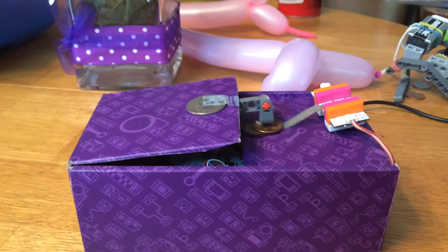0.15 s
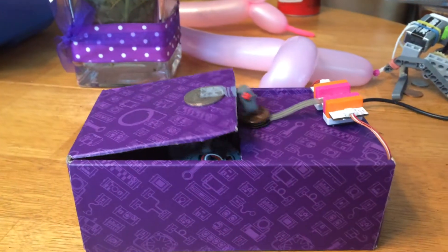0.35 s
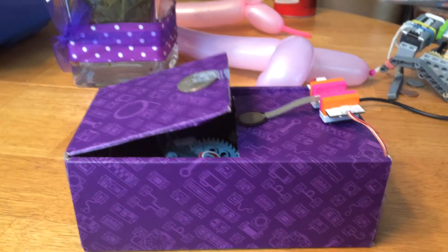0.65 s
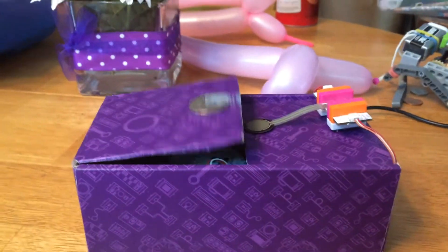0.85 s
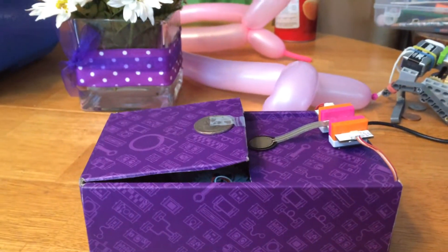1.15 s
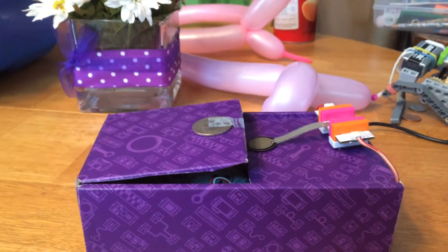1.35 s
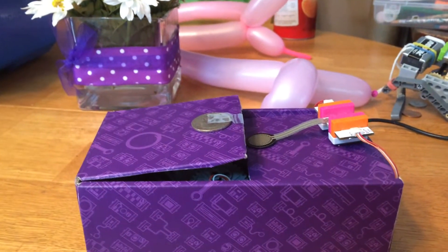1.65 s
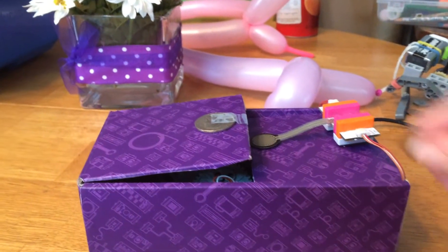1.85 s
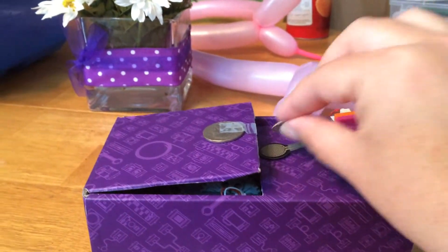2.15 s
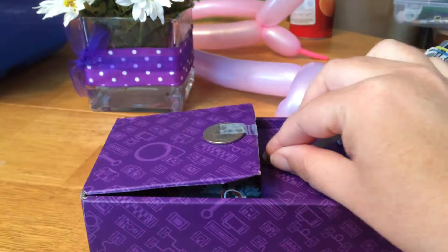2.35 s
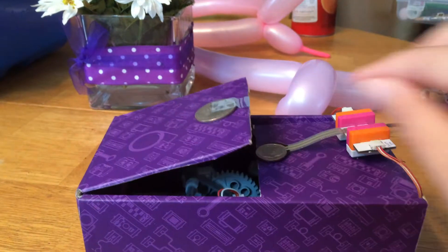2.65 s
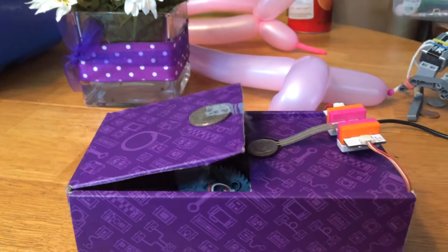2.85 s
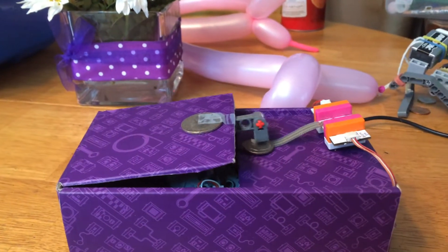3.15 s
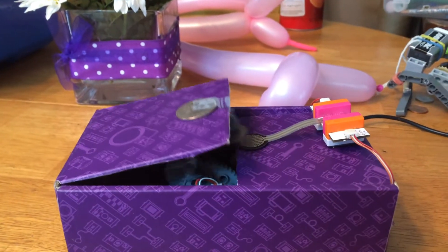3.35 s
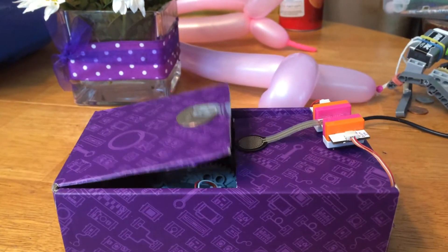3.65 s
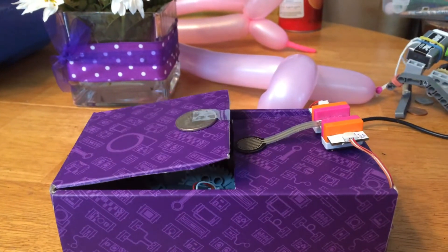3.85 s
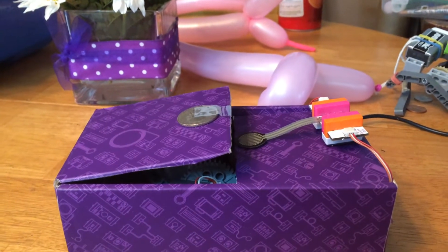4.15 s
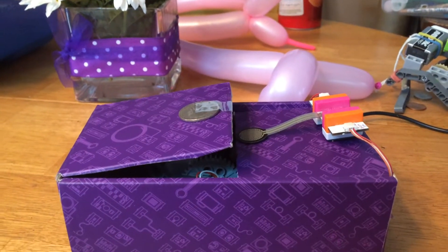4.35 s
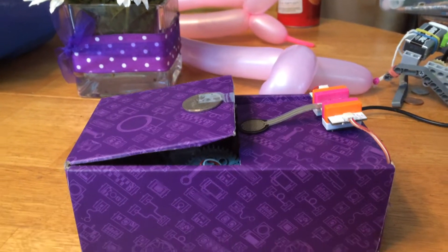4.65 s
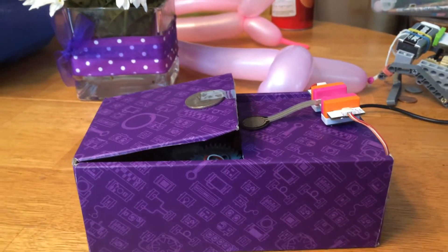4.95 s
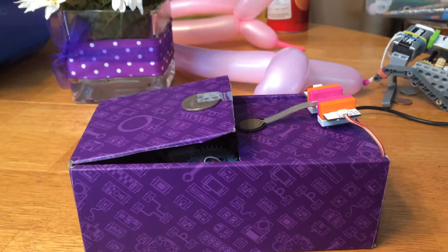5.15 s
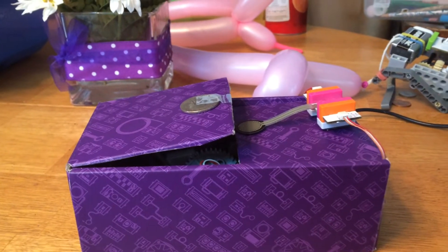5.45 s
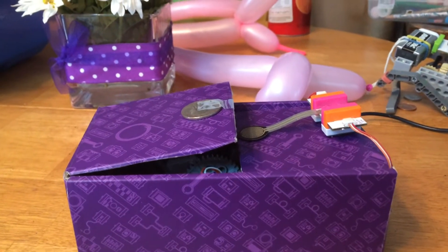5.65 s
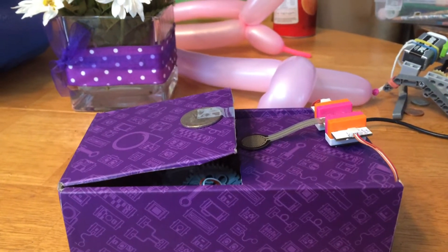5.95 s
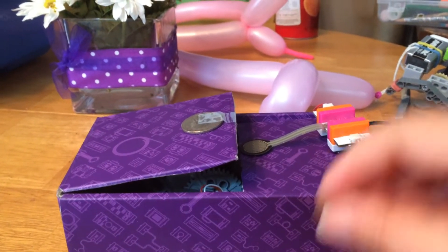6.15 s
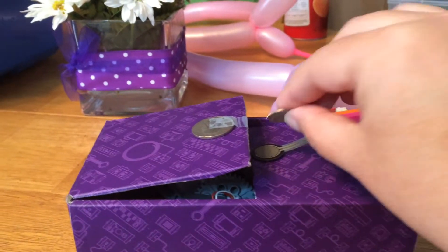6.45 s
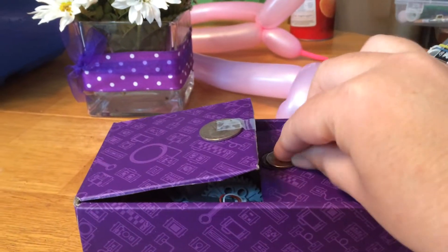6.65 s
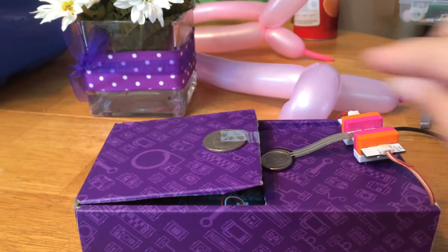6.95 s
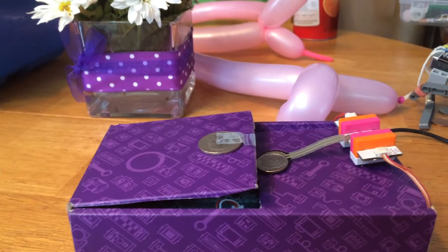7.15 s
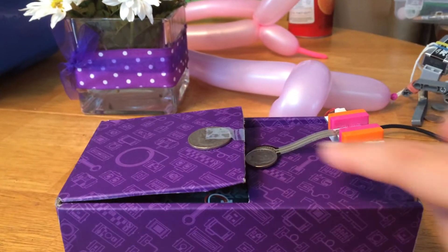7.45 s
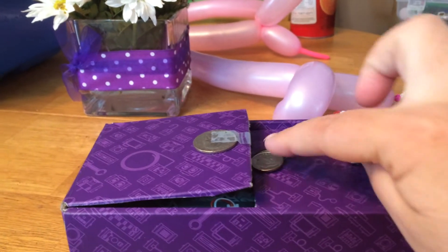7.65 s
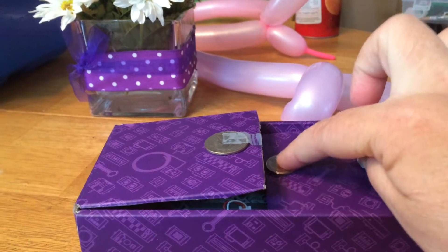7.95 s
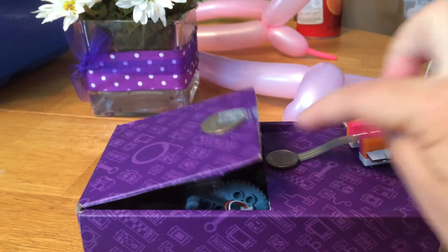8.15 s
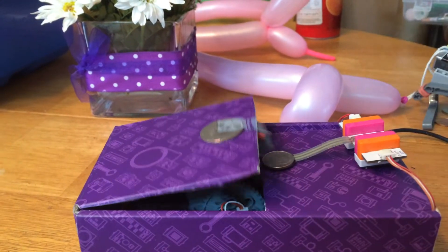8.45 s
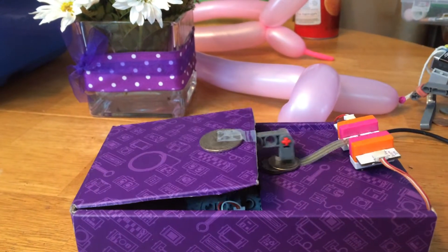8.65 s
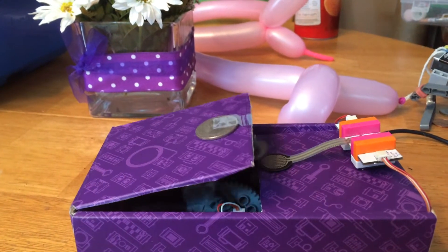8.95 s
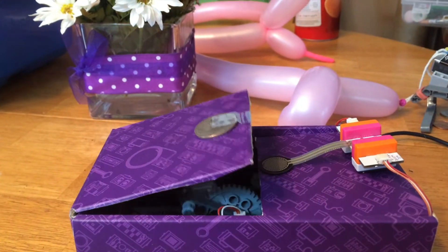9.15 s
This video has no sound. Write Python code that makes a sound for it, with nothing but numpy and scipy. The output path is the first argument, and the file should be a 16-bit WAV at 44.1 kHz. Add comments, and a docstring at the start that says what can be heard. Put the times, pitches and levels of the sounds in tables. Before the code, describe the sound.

Close, dry sound of a motorised toy coin bank on a table. Short spells of raspy plastic gear noise alternate with quiet pauses of faint air and hum. Hollow cardboard thuds and plastic clacks mark the lid and swinging arm. After each of the first two spells a coin ticks down through the works and jingles to rest on other coins. The last spell runs to the end with no coin falling.

```python
"""A small motor whirrs, plastic knocks, and twice a coin tumbles, drops and rings on other coins.
It is a toy coin bank, a cardboard box on a table in a quiet room: a coin laid on its pad is taken by
a motor that lifts the lid and swings an arm. The gears are noise scraped in step with their teeth.
Box, plastic and coins ring with dying tones plus coloured noise for the surfaces that touch.
Scuffs and a fingertip are short shaped noises; still air, a mains hum and a room tail lie around it."""
import sys
import numpy as np
from scipy import signal
from scipy.fft import rfft, irfft
from scipy.io import wavfile

SR = 44100
rng = np.random.default_rng(int(sys.argv[2]) if len(sys.argv) > 2 else 0)


def output_pcm(signal):
    """Save a mono or channel-first signal as 16-bit PCM at the path in sys.argv[1].

    Samples are clipped to [-1, 1] before scaling.
    """
    pcm = np.clip(np.atleast_2d(signal).T, -1, 1) * 32767
    wavfile.write(sys.argv[1], SR, np.round(pcm).astype(np.int16))


N = 409688
TIME = np.arange(N) / SR  # s, the whole scene
HIT = np.arange(16384) / SR  # s, the length of one hit

# In all tables levels are relative: the functions that use them may add a trim.
# Spells of the motor: switched on t/s, switched off t/s, gear level/dB
MOTOR_SPELLS = [(-.1, 0.964, -0.5), (2.47, 3.815, 0), (6.828, 6.915, 1.5), (8.126, 9.4, -0.1)]
# Once a spell the swinging arm strikes the box: t/s, strength/dB
ARM_STRIKES = [(.068, -44), (2.986, -21), (6.932, -22.5), (8.577, -20)]
# Tone colour of shaken or rubbed cardboard: f/Hz, level per Hz/dB
CARD_COLOUR = [(25, -23), (150, -6), (330, -0.5), (580, -2.5), (950, -2), (1400, -11.5), (2200, -11),
               (5000, -38.5)]
# Tones that the cardboard rings with: f/Hz, level/dB, time to fall 60 dB/s
BOX_TONES = [(313.4, -18, 0.2), (496, -8.5, 0.077), (567, 3, 0.031), (644, -5, 0.039), (720, -3, 0.046),
             (850, -1, .05), (960, -4, 0.042), (1165, -0.5, 0.016)]
# Tone colour of clacking plastic: f/Hz, level per Hz/dB
CLACK_COLOUR = [(60, -47.5), (500, -20.5), (1100, -4), (1550, -2), (1950, -2), (2700, -3.5), (3700, -8),
                (4600, -20.5), (8000, -31)]
# Tone colour of the tick of a hard edge: f/Hz, level per Hz/dB
TICK_COLOUR = [(300, -44.5), (2500, -20.5), (4500, -9), (5600, -2.5), (6600, 1), (8200, -3.5),
               (10500, -8.5), (13000, -7), (15200, -14.5), (16500, -34.5)]
# A coin tumbles down through the works: t/s, strength/dB, hardness/dB
COIN_TUMBLES = [(1.341, -34.5, -2.5), (1.358, -24.5, -5), (1.377, -30.5, -3.5), (1.424, -40.5, -0.5),
                (1.468, -30, -0.5), (1.48, -27.5, -8), (1.527, -25.5, 8.5), (4.926, -27, -1.5),
                (4.932, -22, -16.5), (4.959, -28.5, -3), (4.982, -35, 10.5)]
# One table a falling coin, a row a bounce on the pile: t/s, clink level/dB, blow on the box/dB
COIN_DROPS = [
    [(1.5279, -17.5, -22.5), (1.5654, -20.5, -29), (1.5863, -17, -22), (1.5938, -13, -36),
     (1.6354, -25.5, -27), (1.6696, -27.5, -34.5), (1.7449, -24.5, -40.5)],
    [(4.9916, -16.5, -20), (5.0355, -19, -34), (5.0779, -14.5, -25), (5.1397, -13, -27.5),
     (5.1931, -15.5, -26), (5.2234, -21.5, -33), (5.3009, -20, -34.5)],
]
# One table a coin, a row a tone it rings with: f/Hz, level/dB, time to fall 60 dB/s
COIN_TONES = [
    [(8460, -11, 0.072), (9205, 0, 0.068), (9500, -1, 0.032), (9600, -8.5, .05), (13110, -11.5, .2),
     (15070, 0.5, 0.26), (15490, -13.5, .07)],
    [(9400, 0, .07), (9010, 1.5, 0.14), (9360, 6.5, .075), (10040, 1.5, .06), (12160, -7.5, 0.15),
     (15200, 10.5, .06), (15440, -3.5, 0.079)],
]
# A coin is set down on the pad: t/s, strength/dB, f that this spot of the card favours/Hz
COIN_TAPS = [(2.312, -35, 1200), (2.333, -41.5, 1200), (2.399, -27.5, 450), (6.663, -33, 560),
             (6.712, -29, 580), (6.72, -24.5, 580), (6.773, -37.5, 580)]


def amp(db):
    """Turns decibels into a gain."""
    return 10 ** (np.asarray(db) / 20)


def evened(x):
    """Scales a sound to an average (rms) level of 1."""
    return x / np.sqrt(np.mean(x ** 2) + 1e-20)


def blow(x):
    """Scales a hit to the energy of 5 ms at rms 1."""
    return x / np.sqrt(np.sum(x ** 2) / (.005 * SR) + 1e-20)


def read(points, hz):
    """Joins (Hz, value) points by straight lines on a log-frequency axis."""
    f, value = np.transpose(points)
    return np.interp(np.log(hz + 1), np.log(f + 1), value)


def add(mix, s, sound):
    """Mixes a sound in at time s."""
    part = mix[max(round(s * SR), 0):][:len(sound)]
    part += sound[:len(part)]


def colour(x, points, size=4096):
    """Filters a sound to the given tone colour, with no echo ahead of a hit."""
    log_gain = np.log(amp(read(points, abs(np.fft.fftfreq(size, 1 / SR)))))
    # the Hilbert transform supplies the phase that keeps the filter causal
    response = np.fft.ifft(np.exp(np.conj(signal.hilbert(log_gain)))).real[:size // 2]
    return signal.oaconvolve(x, response)[:len(x)]


def resonate(x, hz, width):
    """One resonance that leaves its centre at gain 1; hz and width in Hz."""
    return signal.lfilter(*signal.iirpeak(hz, hz / width, SR), x)


def drift(rate):
    """Slow random drift of rms 1 with about rate swings a second."""
    hz = np.fft.rfftfreq(N // 32, 32 / SR)
    slow = irfft(rfft(rng.standard_normal(N // 32)) / (1 + (hz / rate) ** 4))
    return evened(np.interp(TIME, np.linspace(0, TIME[-1], len(slow)), slow))


def ring(tones, spread_db, detune):
    """Dying tones of a struck body; each blow lands on another spot and weights them anew."""
    hz, db, t60 = np.transpose(tones)[:, :, None]
    weight, shift, side = rng.standard_normal((3, len(tones), 1))
    level = amp(db + spread_db * weight - 60 * HIT / t60)
    waves = np.sin(2 * np.pi * hz * (1 + detune * shift) * HIT)
    return (np.sign(side) * level * waves).sum(0)


def contact(t60, first, chatter_db, chatter_t60):
    """A sharp push, a short crush of the surfaces, and fading chatter of loose parts."""
    crush, chatter = rng.standard_normal((2, len(HIT)))
    force = blow(crush * amp(-60 * HIT / t60))
    # cubing the noise makes its peaks stand out like separate small hits
    force = force + amp(chatter_db) * blow(chatter ** 3 * amp(-60 * HIT / chatter_t60))
    push = blow(1. * (HIT == 0))
    return blow(force + first * push)


def background(air_db=-69):
    """Still room air as coloured noise, and a faint mains hum of steady tones."""
    # Tone colour of the air: f/Hz, level per Hz/dB
    air_colour = [(15, -36.5), (36, -0.5), (198, -5), (239, -8), (409, -12), (1230, -22), (1890, -18),
                  (3910, -25), (12800, -26), (15400, -34)]
    # Hum tones: f/Hz, level/dB
    hum_tones = [(120, -79.5), (179, -81), (239.5, -76.5)]
    air_gain = amp(read(air_colour, np.fft.rfftfreq(N, 1 / SR)))
    air = irfft(rfft(rng.standard_normal(N)) * air_gain, N)
    hum = sum(amp(db) * np.sqrt(2) * np.sin(2 * np.pi * (hz * TIME + rng.random())) for hz, db in hum_tones)
    return amp(air_db) * evened(air) + hum


def drive(lurch_db=2.86, spin_up=449, coast=190, shudder_db=-53.5, calm=4):
    """Gains of hiss, grind and shudder: a spell spins up, follows the stroke with lurches and coasts.

    spin_up, coast and calm are in dB per s; shudder_db is the shaking as the arm strikes."""
    # Every spell follows this crank stroke: t after the arm strikes/s,
    # hiss of the fast gears/dB, grind of the loaded gears/dB
    stroke = [(-.52, -55, -54.5), (-.44, -46.5, -51.5), (-.38, -55, -50.5), (-.08, -52, -51.5),
              (.05, -59, -55.5), (.15, -56, -58), (.212, -68.5, -65), (.243, -52, -60.5), (.35, -60, -57),
              (.46, -54, -52.5), (.62, -58, -55), (.77, -56, -52.5), (.825, -67.5, -65), (.89, -61, -57.5)]
    when, hiss_db, grind_db = np.transpose(stroke)
    gains = np.zeros((3, N))
    for (on, off, db), (strike, _) in zip(MOTOR_SPELLS, ARM_STRIKES):
        power_db = db - spin_up * np.maximum(on - TIME, 0) - coast * np.maximum(TIME - off, 0)
        t = np.clip(TIME - strike, when[0], when[-1])
        stroke_db = [np.interp(t, when, hiss_db), np.interp(t, when, grind_db), shudder_db - calm * t]
        gains += amp(power_db + np.array(stroke_db))
    return gains * amp(lurch_db * np.outer([1, .5, .5], drift(22)))


def teeth(turns, force, steady, decay, spread_db):
    """Steady friction plus one scrape of uneven force for each gear beat."""
    grit = amp(3 * drift(350))
    scrape = np.exp(-(turns % 1) / decay) * amp(spread_db * force)
    return (steady + scrape) * grit * rng.standard_normal(N)


def gears(scrape, spectrum, tones, patchy_db):
    """The scraping rings the wheels; each swells and fades as it turns."""
    body = colour(scrape, spectrum)
    wheels = 0
    for hz, width, db in tones:
        swell_db = patchy_db * np.minimum(drift(18), 1.5)
        wheels = wheels + amp(db + swell_db) * resonate(body, hz, width)
    return evened(body + wheels)


def motor(tooth_hz=49.34, waver=.008):
    """Two gear stages scrape in step with the beat of the teeth and shake the box."""
    # Tone colours of the fast and the loaded gears: f/Hz, level per Hz/dB
    hiss_colour = [(5000, -18.5), (6300, -6.5), (7400, -8), (8600, -3.5), (9800, -13), (13300, -9),
                   (15000, -19.5), (15800, -42.5)]
    grind_colour = [(500, -24), (1200, -5.5), (1900, -9.5), (2400, -2), (3300, -5), (3900, -6.5),
                    (5300, -9), (6200, -17.5)]
    # Resonances of the small and the large gears: f/Hz, width/Hz, level/dB
    small_gears = [(6430, 290, -1), (7070, 480, -3), (7730, 630, 3)]
    large_gears = [(1046, 120, 3.5), (1770, 300, -2.2), (2390, 660, 0.5), (3290, 370, -2.5),
                   (4552, 61, 4.5), (5140, 230, -4)]
    hiss, grind, shudder = drive()
    turns = np.cumsum(tooth_hz * (1 + waver * drift(2.2))) / SR  # gear beats so far
    # one random force for each gear beat
    force, jolt = np.clip(rng.standard_normal((2, 1000)), -2, 1.2)[:, turns.astype(int)]
    fast_scrape = teeth(turns, force, steady=.9, decay=.3, spread_db=5)
    fast = gears(fast_scrape, hiss_colour, small_gears, patchy_db=3.5)
    loaded_scrape = teeth(turns, force, steady=.9, decay=.3, spread_db=4.5)
    loaded = gears(loaded_scrape, grind_colour, large_gears, patchy_db=4.5)
    shake = teeth(turns, jolt, steady=0.36, decay=.3, spread_db=7.5)
    card_ring = signal.fftconvolve(shake, ring(BOX_TONES, spread_db=1.0, detune=0.0037))[:N]
    box = evened(colour(shake, CARD_COLOUR)) + 0.85 * evened(card_ring)
    return hiss * fast + grind * loaded + shudder * evened(box)


def arm_strikes(count=3, rebound_s=.066, rebound_db=-8.5, hard_db=-11):
    """The arm strikes once a stroke and rebounds while the motor pushes it: (s, strength, hardness dB)."""
    rows = []
    for (_, off, _), (s, db) in zip(MOTOR_SPELLS, ARM_STRIKES):
        for k in range(count):
            if k == 0 or s + k * rebound_s < off:
                rows.append((s + k * rebound_s, db + k * rebound_db, hard_db))
    return rows


def blows(edge_db=-12):
    """All hard blows on the box: (s, thud, clack, tick dB); the harder, the more clack and tick."""
    # Lid and linkage knock on the box: t/s, strength/dB, hardness/dB
    lid_knocks = [(.104, -35, -4), (.323, -37.5, -20), (.504, -40, -9), (.841, -30, -15.5),
                  (0.949, -20.5, -18.5), (.972, -35.5, -10), (2.54, -18, -10.5), (2.64, -20.5, -13.5),
                  (2.657, -13, -6.5), (2.835, -36, -14), (3.439, -42.5, -20), (3.864, -45, -12.5),
                  (3.899, -51, -6), (6.87, -26.5, -14.5), (6.92, -28, -21), (8.107, -38.5, -14),
                  (8.227, -15.5, -4), (8.289, -32, -9)]
    hits = lid_knocks + COIN_TUMBLES + arm_strikes()
    return [(s, db, db + hard_db, db + hard_db + edge_db) for s, db, hard_db in hits]


def knocks(thud_db=-6, clack_db=-5.5, frame_db=-4, tick_db=-1, lag=0.0011):
    """Each knock rings the cardboard, with a clack of plastic and a tick of the hard edge."""
    # Tones of arm and frame: f/Hz, level/dB, time to fall 60 dB/s
    plastic_tones = [(1447, -8.5, .05), (1626, 0, 0.026), (1847, -9.5, 0.11), (2152, -6.5, .04),
                     (2470, 1.5, 0.028)]
    out = np.zeros(N)
    for s, thud, clack, tick in blows():
        yielding = 1 - np.exp(-HIT / 0.00053)  # soft card gives way, so the thud starts softly
        card = blow(ring(BOX_TONES, spread_db=4.0, detune=.012) * yielding)
        frame = blow(ring(plastic_tones, spread_db=6.5, detune=0.019))
        clack_touch = contact(t60=0.017, first=.5, chatter_db=-5.0, chatter_t60=0.14)
        tick_touch = contact(t60=0.028, first=.5, chatter_db=-3.5, chatter_t60=0.11)
        sound = amp(thud + thud_db) * card
        sound += amp(clack + frame_db) * frame
        sound += amp(clack + clack_db) * blow(colour(clack_touch, CLACK_COLOUR))
        sound += amp(tick + tick_db) * blow(colour(tick_touch, TICK_COLOUR))
        add(out, s + lag, sound)
    # the knocks keep little bass below about 190 Hz
    return signal.sosfilt(signal.butter(2, 190, "high", fs=SR, output="sos"), out)


def table(hz=140, t60=0.15, sway_hz=80, sway_db=-9, blow_db=-35.5, press_db=-23):
    """Soft low bumps of the table top: two dying tones for the hand, blows on the box and coin taps."""
    # The hand bumps the table: t/s, level/dB
    hand_bumps = [(7.012, -48), (7.057, -59), (7.606, -54.5)]
    # blow_db and press_db: the share of a blow or a fingertip's press that gets through
    from_blows = [(s, thud + blow_db) for s, thud, _, _ in blows()]
    from_taps = [(s, db + press_db) for s, db, _ in COIN_TAPS]
    out = np.zeros(N)
    for s, db in hand_bumps + from_blows + from_taps:
        phase = 2 * np.pi * HIT * rng.uniform(.85, 1.2)  # each bump has its own pitch around hz
        bump = np.sin(hz * phase) + amp(sway_db) * np.sin(sway_hz * phase)
        add(out, s, amp(db - 60 * HIT / t60) * bump)
    return out


def scuffs(t60=0.033, spread=0.82, level_db=-7):
    """Short scuffs of band-limited noise that build up and end in a tap."""
    # Small scuffs and taps around the box: t/s, level/dB, centre f/Hz, build-up/s
    small_scuffs = [(1.285, -46, 1180, 0.0015), (1.335, -39, 1780, .006), (2.395, -41, 1000, 0.034),
                    (4.70, -48.5, 2000, .0017), (4.88, -52, 887, 0.0074), (5.355, -39, 1780, 0.0017),
                    (5.409, -38, 1480, .023), (5.601, -33.5, 2950, 0.00029), (5.636, -50.5, 2920, .007),
                    (5.68, -51.5, 1490, .0015), (5.766, -45.5, 1713, .019), (6.019, -34, 2440, 0.0054),
                    (6.022, -29.5, 1260, 0.0046)]
    out = np.zeros(N)
    t = HIT - .1  # the tap comes at t = 0
    for s, db, hz, build in small_scuffs:
        shape = np.exp(np.minimum(t, 0) / build) * amp(-60 * np.maximum(t, 0) / t60)
        tap = shape * rng.standard_normal(len(t))
        tap = resonate(resonate(tap, hz, hz * spread), hz, hz * spread)
        add(out, s + t[0], amp(db + level_db) * blow(tap))
    return out


def jingle(ring_db=-18, crack_db=-10, crack_per_hard=1.9, crack_hz=2850, crack_width=1100, lag=.001):
    """A tumbling coin's rim cracks against plastic, most on hard hits, and the coin rings faintly."""
    out = np.zeros(N)
    for s, db, hard_db in COIN_TUMBLES:
        nearest = np.argmin([abs(bounces[0][0] - s) for bounces in COIN_DROPS])  # which coin this is
        crack = contact(t60=0.0024, first=1.5, chatter_db=-14.5, chatter_t60=.03)
        crack = resonate(resonate(crack, crack_hz, crack_width), crack_hz, 2 * crack_width)
        metal = ring(COIN_TONES[nearest][:5], spread_db=3, detune=0.0032)
        sound = amp(db + crack_per_hard * hard_db + crack_db) * blow(crack)
        sound += amp(db + hard_db + ring_db) * blow(metal)
        add(out, s + lag, sound)
    return out


def touches(bounces, count=3, uneven=.25, spread_db=3.5, settle_power=1.4,
            rock_s=.011, rock_db=-7.5, rock_fade_db=-4, free_ring_db=-16.5, settle_db=-34):
    """A coin rocks from rim to rim after a bounce and its high ring is damped as it settles.

    Gives rows of (s, clink dB, blow dB, high ring dB)."""
    first, last = bounces[0][0], bounces[-1][0]
    next_times = [row[0] for row in bounces[1:]] + [last]  # the last bounce has no rocking
    rows = []
    for (s, clink, floor), following in zip(bounces, next_times):
        late, force = rng.standard_normal((2, count))
        hits = [(s, 0)]
        for k in range(count):
            if s + (k + 1) * rock_s < following:
                at = s + rock_s * (k + 1 + uneven * late[k])
                hits.append((at, rock_db + k * rock_fade_db + spread_db * force[k]))
        for at, db in hits:
            settled = ((at - first) / (last - first)) ** settle_power
            rows.append((at, clink + db, floor + db, free_ring_db + db + settle_db * settled))
    return rows


def coins(clink_db=-9, low_ring_db=-12, floor_db=-2, high_ring_db=-1, sizzle_db=-12, lag=0.001,
          rest_s=0.031, rest_db_per_s=700):
    """A coin bounces and chatters on the pile: metal rings, and the floor of the box drums."""
    # Tone colours of the clink and of the box floor: f/Hz, level per Hz/dB
    clink_colour = [(200, -49.5), (3000, -29.5), (5500, -26.5), (7500, -4), (9200, 13), (10300, -3.5),
                    (11700, -14), (13000, -10), (14200, -18), (15200, -8), (16000, -37.5)]
    floor_colour = [(60, -36.5), (140, -16.5), (190, -3), (240, -9), (420, -8), (680, 3.5), (1100, -0.5),
                    (2300, -3.5), (3500, -12), (4600, -18.5), (9000, -23.5)]
    out = np.zeros(N)
    for bounces, tones in zip(COIN_DROPS, COIN_TONES):
        rest = bounces[-1][0] - rest_s  # the coin sinks onto the pile, which chokes the ring
        for s, clink, floor, high in touches(bounces):
            # the rim keeps touching its neighbours, which breaks up the ring
            rim = contact(t60=0.0072, first=2.2, chatter_db=-2.5, chatter_t60=0.025)
            low_tones = ring(tones[:4], spread_db=2.5, detune=.006)
            low_ring = signal.fftconvolve(rim, low_tones)[:len(HIT)]
            high_tones = ring(tones[4:], spread_db=1.5, detune=.0004)
            high_ring = signal.fftconvolve(rim, high_tones)[:len(HIT)]
            sizzle = contact(t60=0.017, first=.2, chatter_db=3.5, chatter_t60=0.15)
            sizzle = resonate(resonate(sizzle, 13000, 3500), 13000, 5000)
            clink_touch = contact(t60=0.0065, first=0.76, chatter_db=-6.5, chatter_t60=.08)
            # the card under the pile answers each touch
            drum = contact(t60=0.048, first=0.48, chatter_db=-4, chatter_t60=0.18)
            choke = amp(-rest_db_per_s * np.maximum(HIT - max(rest - s, 0), 0))
            sound = amp(clink + clink_db) * blow(colour(clink_touch, clink_colour))
            sound += amp(clink + low_ring_db) * blow(low_ring) * choke
            sound += amp(high + high_ring_db) * blow(high_ring) * choke
            sound += amp((clink + high) / 2 + sizzle_db) * blow(sizzle)
            sound += amp(floor + floor_db) * blow(colour(drum, floor_colour))
            add(out, s + lag, sound)
    return out


def taps(db_per_octave=15, clack_db=-18.5, tick_db=-20, lag=.001):
    """A coin under a fingertip thuds softly on the card, ringing the tones of that spot."""
    out = np.zeros(N)
    for s, db, spot_hz in COIN_TAPS:
        # tones far from the spot's favourite are weaker
        tones = [(hz, level - db_per_octave * abs(np.log2(hz / spot_hz)), t60) for hz, level, t60 in BOX_TONES]
        touch = contact(t60=0.035, first=.5, chatter_db=-0.5, chatter_t60=.08)
        sound = blow(ring(tones, spread_db=6, detune=0.004) * (1 - np.exp(-HIT / 0.0004)))
        sound += amp(clack_db) * blow(colour(touch, CLACK_COLOUR))
        sound += amp(tick_db) * blow(colour(touch, TICK_COLOUR))
        add(out, s + lag, amp(db) * sound)
    return out


def finger(grip_db=4):
    """Skin sticks and slips on the cardboard: noise of quickly wavering strength."""
    # A fingertip presses the coin: t/s, level/dB
    rub = [(7.8, -90), (7.818, -63.5), (7.902, -59.5), (7.916, -72), (8.022, -64), (8.032, -52),
           (8.09, -69.5)]
    s, db = np.transpose(rub)
    slips = colour(amp(grip_db * drift(81)) * rng.standard_normal(N), CARD_COLOUR)
    return amp(np.interp(TIME, s, db, -150, -150)) * evened(resonate(slips, 900, 1500))


def room(x, build=0.0059, treble_db=-7):
    """A diffuse tail that dies band by band; furnishings soak up the treble."""
    # Fading of the room: f/Hz, time to fall 60 dB/s
    fading = [(150, 0.77), (600, 0.23), (2000, 0.22), (6000, 0.23), (15000, 0.095)]
    hz, t, z = signal.stft(rng.standard_normal(SR), SR, nperseg=256)
    decay = amp(-60 * t / read(fading, hz)[:, None]) * (1 - np.exp(-t / build))
    tail = signal.istft(z * decay, SR, nperseg=256)[1]
    wet = signal.fftconvolve(x, tail / np.linalg.norm(tail))[:N]
    return colour(wet, [(2500, 0.00078), (9000, treble_db)])


def scene(near_wet_db=-17, far_wet_db=-5):
    """The box is close and dry; the scuffs carry more of the room."""
    near = motor() + knocks() + taps() + jingle() + coins() + table() + finger()
    far = scuffs()
    wet = room(amp(near_wet_db) * near + amp(far_wet_db) * far)
    return (near + far + wet + background())[None]


def record(dry, edge_hz=15800):
    """Cuts off the treble above edge_hz with a steep low-pass filter."""
    low_pass = signal.firwin(511, edge_hz, window=("kaiser", 9), fs=SR)
    return signal.oaconvolve(dry, low_pass[None], "same")


dry = scene()
out = record(dry)
output_pcm(out)
```